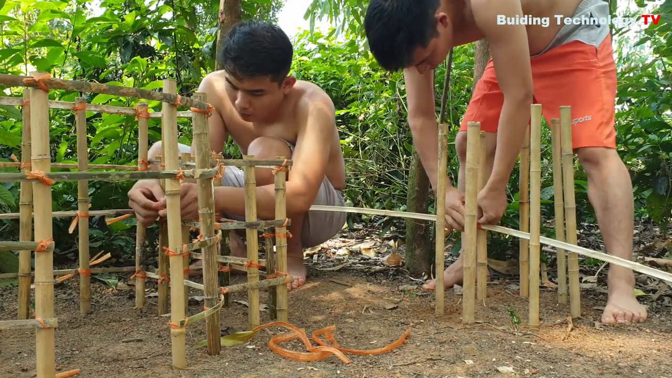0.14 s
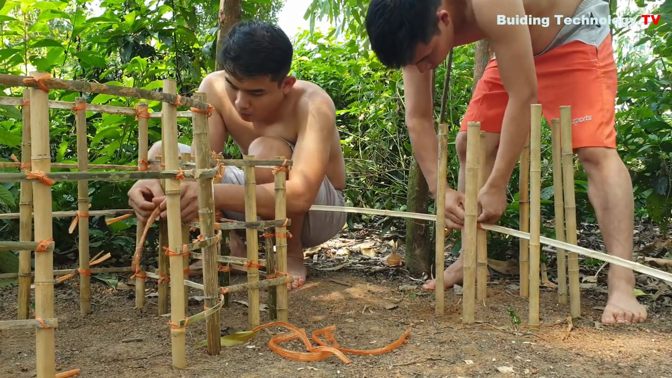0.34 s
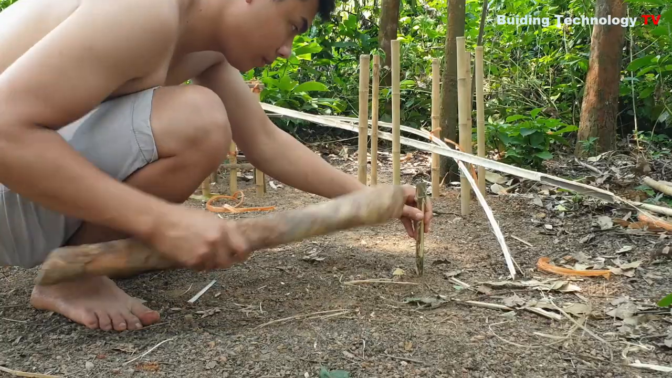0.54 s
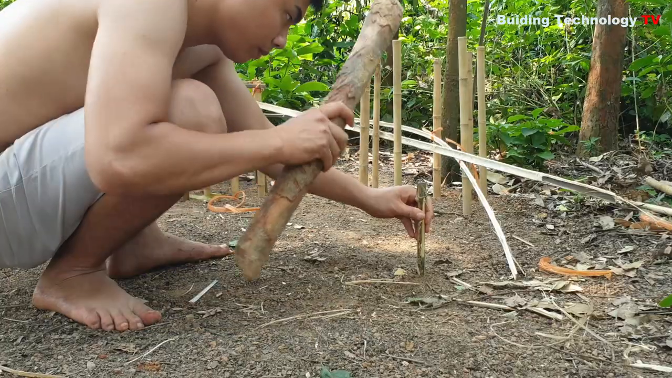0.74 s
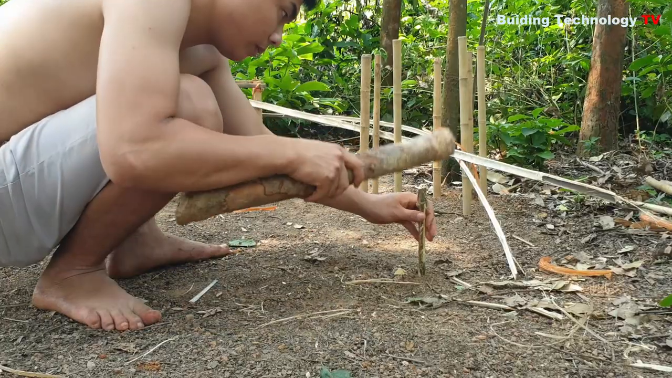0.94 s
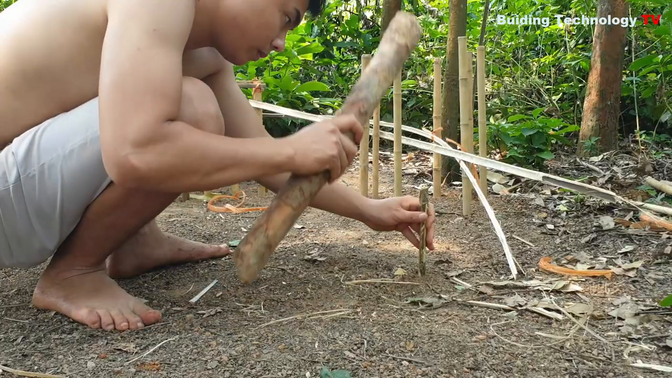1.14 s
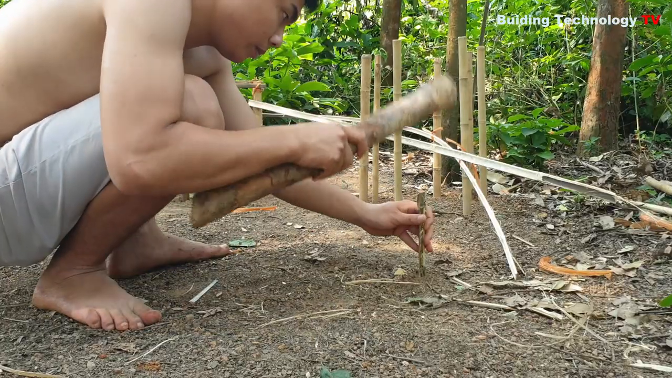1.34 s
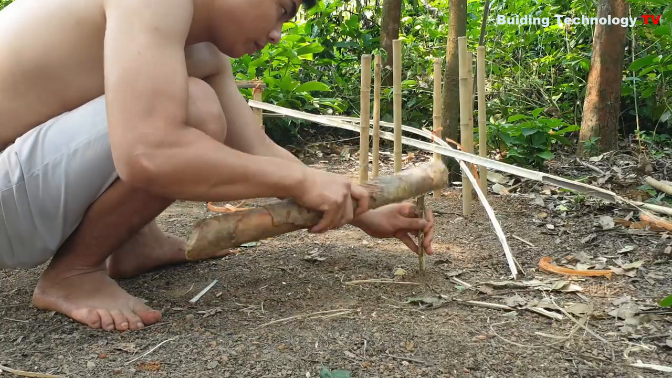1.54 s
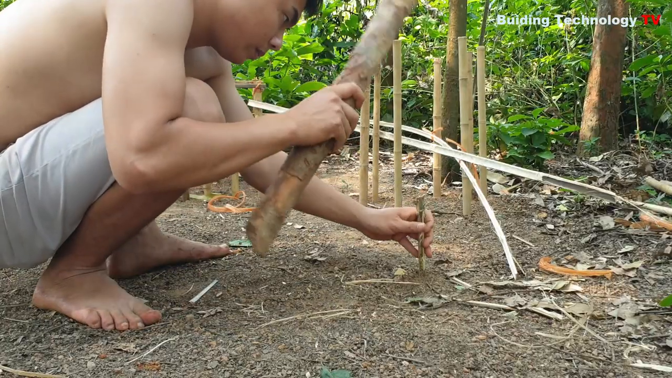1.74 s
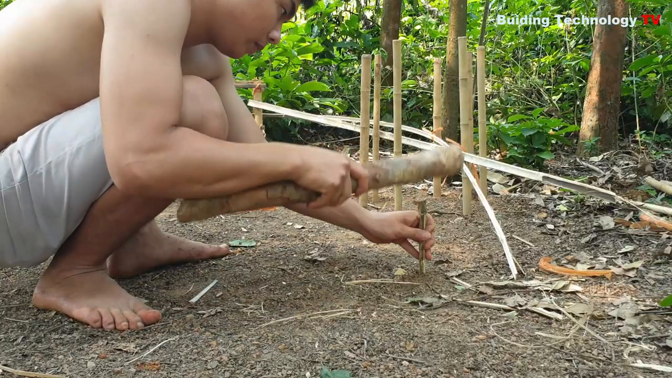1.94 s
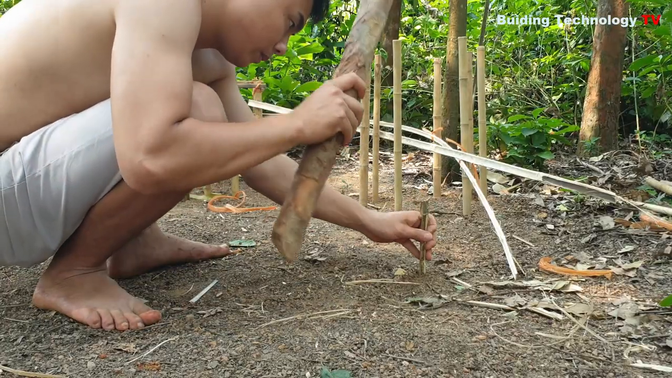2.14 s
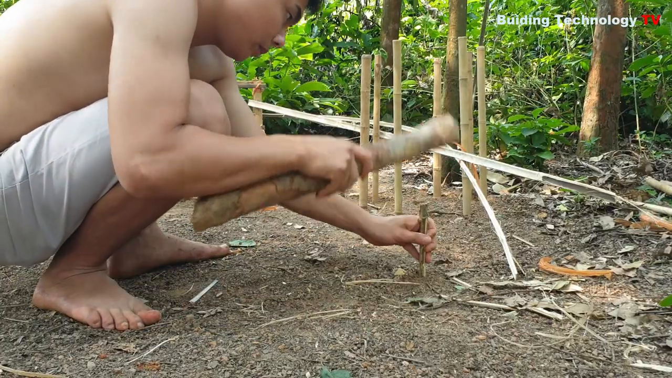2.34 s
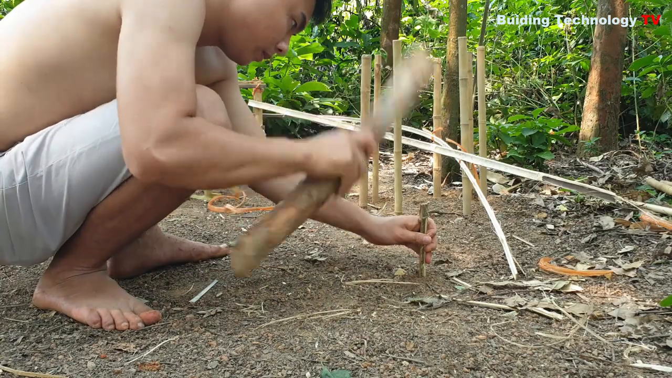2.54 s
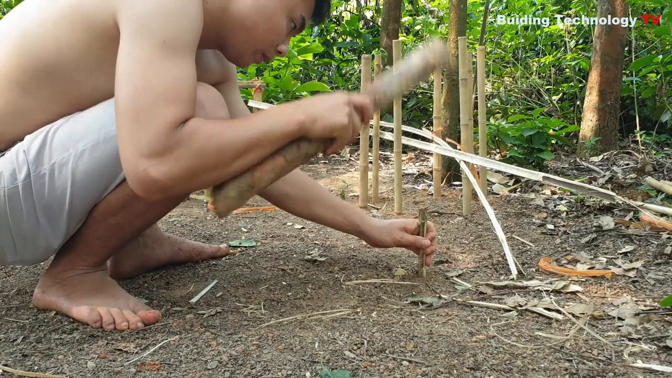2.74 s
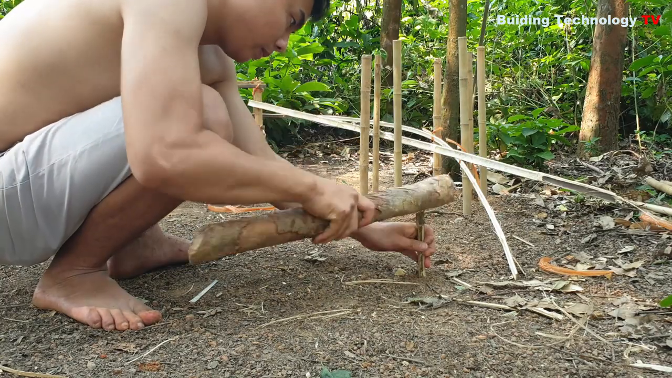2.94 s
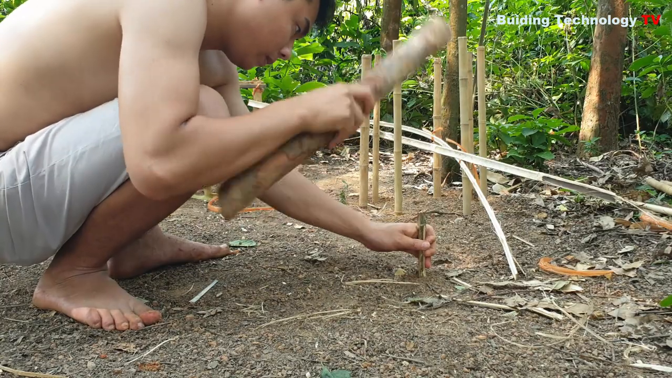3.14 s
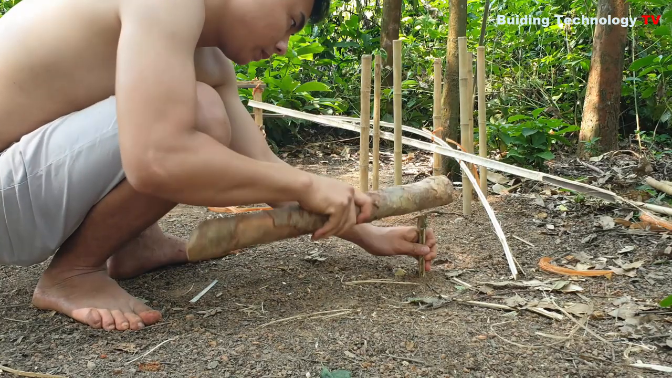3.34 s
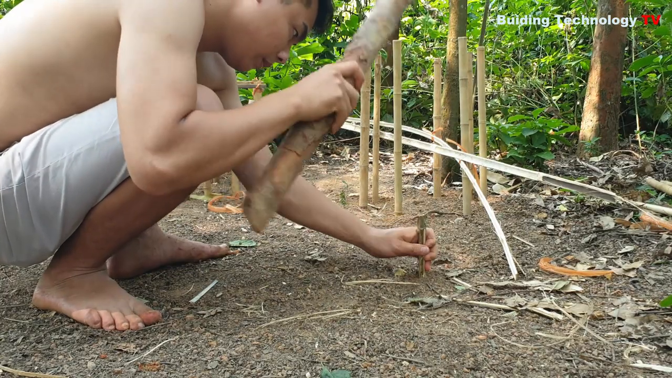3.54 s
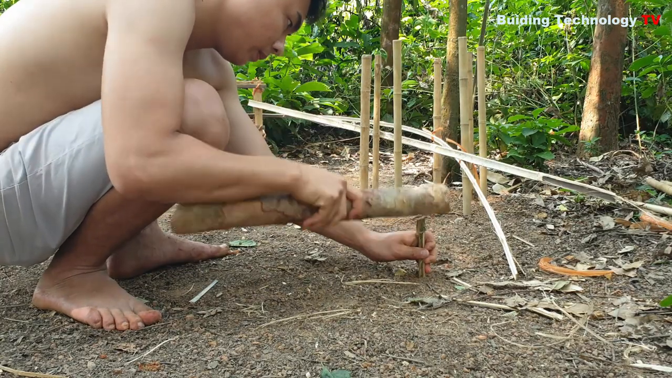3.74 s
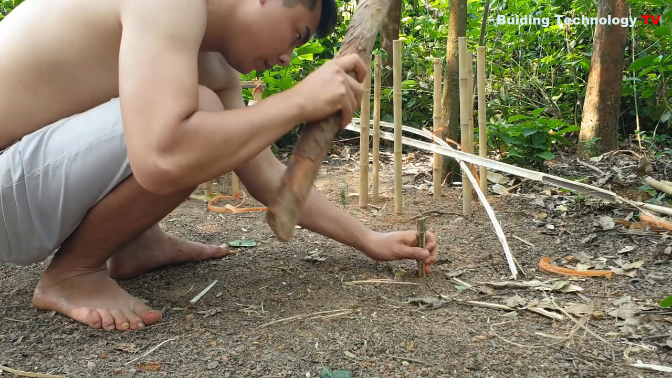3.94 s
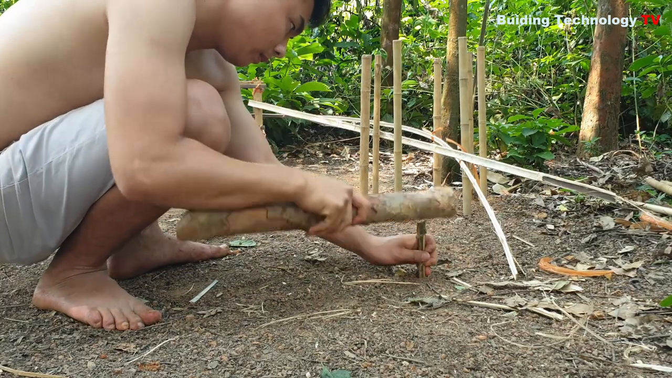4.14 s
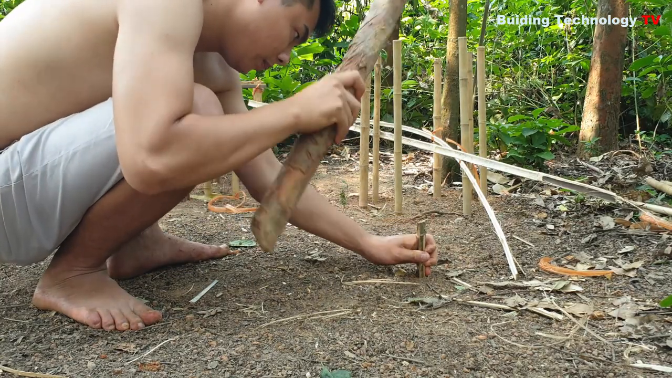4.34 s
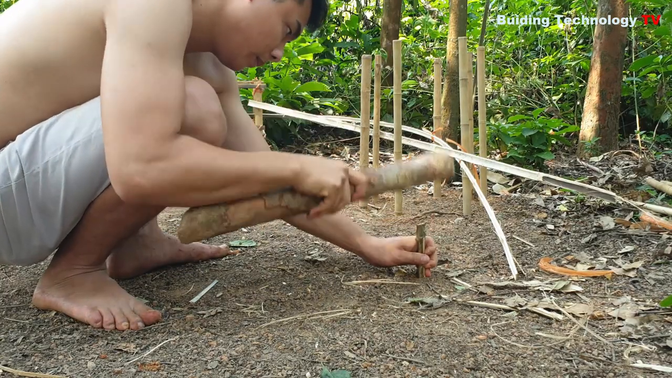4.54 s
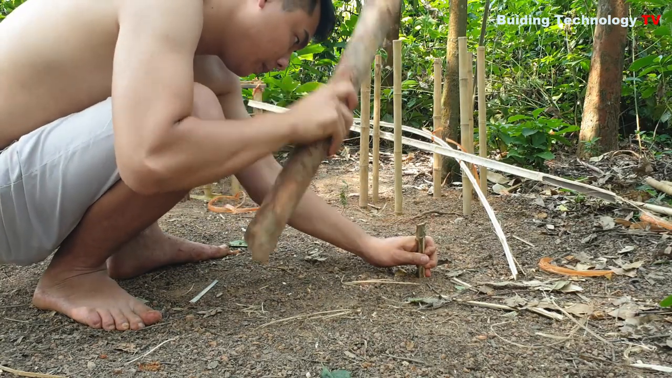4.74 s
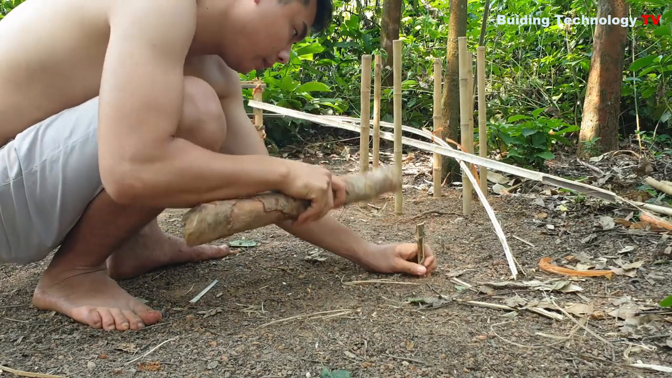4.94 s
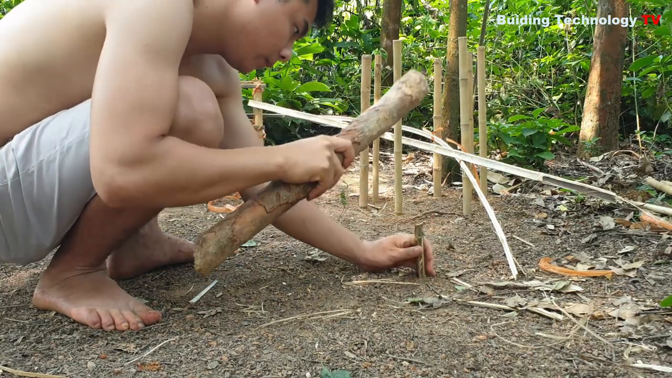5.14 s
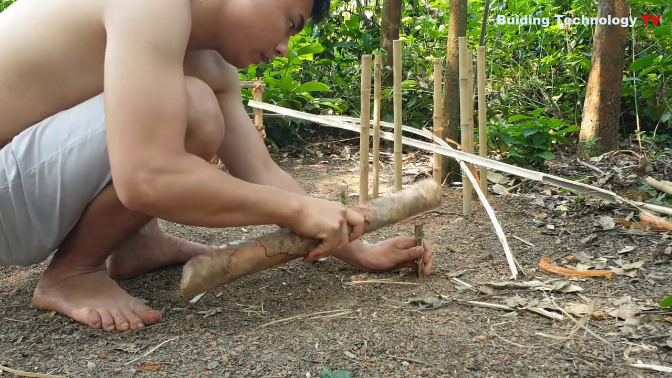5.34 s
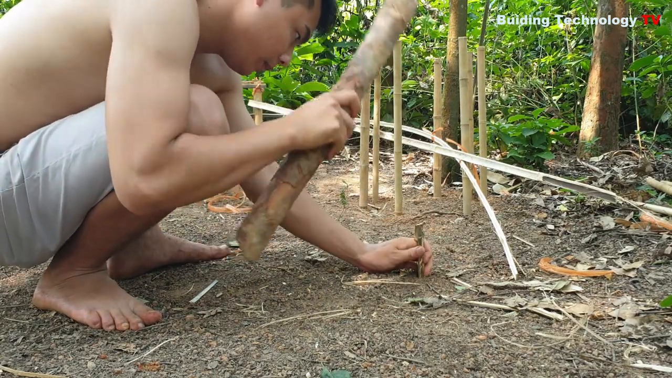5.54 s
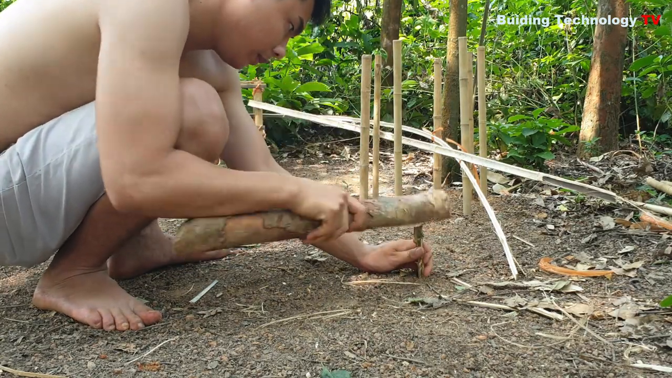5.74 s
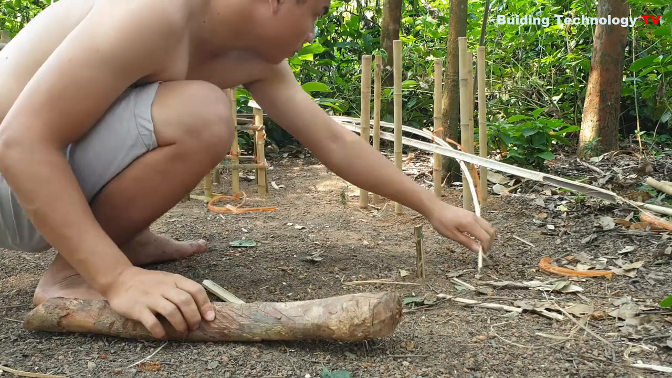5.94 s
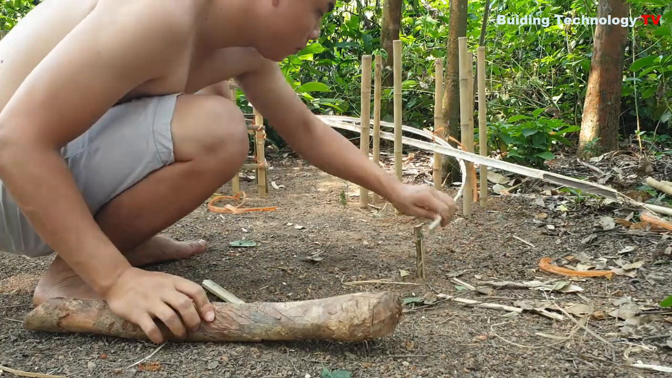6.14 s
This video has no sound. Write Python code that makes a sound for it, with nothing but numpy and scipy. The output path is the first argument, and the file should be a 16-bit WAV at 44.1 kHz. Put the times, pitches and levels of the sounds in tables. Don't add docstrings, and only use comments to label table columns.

```python
import sys
import numpy as np
from scipy import signal
from scipy.fft import rfft, irfft, next_fast_len
from scipy.io import wavfile
from scipy.ndimage import uniform_filter1d

SR = 44100
rng = np.random.default_rng(int(sys.argv[2]) if len(sys.argv) > 2 else 0)


def volts(x):
    e = np.asarray(x, float) / 20
    return 10 ** e


def store_wav(level_fs):
    pcm = np.round(np.clip(np.atleast_2d(level_fs), -1, 1) * 32767)
    wavfile.write(sys.argv[1], SR, pcm.T.astype(np.int16))


N = 276948
SPOT_CHANGE_S = 0.662

# (frequency [Hz], level [dB])
FIRST_AIR = [(15, -47), (25, -27), (66, -1.5), (141, 4.5), (344, -11), (489, -15.5), (545, -27), (818, -23),
             (2110, -33.5), (2690, -34.5), (8360, -28), (16000, -39)]
AIR = [(15, -46), (25, -61), (53, -6), (87, -1), (153, -10), (195, -11), (489, -27), (1560, -33.5),
       (2110, -29), (3720, -29), (9840, -31.5), (14800, -32.5), (16000, -33)]
FIRST_AIR_DB, AIR_DB = -47, -47.5
AIR_KNEE_HZ, AIR_STEP_DB, AIR_TOP_HZ = 10400, -9.5, 15900
HUSH_TOP_HZ, HUSH_DB = 15180, -77
RUMBLE_DB, RUMBLE_TOP_HZ = -61, 620
# (frequency [Hz], likeness [1])
LIKENESS = [(60, 0.93), (180, 0.94), (550, 0.1), (1650, -1.4), (4970, -1.3), (15000, -0.86)]
PORT_LAG = 1.354

# (time of height [s], rise and fall [s], level [dB], broad sweep re thin leaves [dB])
STIRS = [(0.001, 0.35, -70.5, 11.5), (0.279, 0.13, -61.5, -14), (.44, 0.13, -53.5, -13),
         (.61, 0.096, -55.5, -13.5), (.75, 0.42, -67.5, -6), (1.0, 0.29, -80.5, 15),
         (2.33, 0.34, -57.5, -13), (2.46, 0.07, -57, -19), (2.59, 0.09, -55, -17), (2.7, 0.1, -65.5, 2.5),
         (3.03, 0.25, -58.5, -9.5), (3.691, 0.073, -58.5, -4.5), (3.79, 0.1, -52.5, -7.5),
         (4.16, 0.047, -65.5, -12.5), (4.32, 0.19, -53, -17), (4.9, 0.083, -55, -8.5),
         (5.183, 0.089, -41.5, -11.5), (5.456, 0.16, -57, -16), (5.75, 0.86, -63, -4.5),
         (6.0, 0.27, -59, -7.5), (6.26, 0.28, -50.5, -12)]
STILL_DB, STIR_FALL_DB = -85.5, 23.5
# (frequency [Hz], level [dB], t60 [s])
TAIL = [(294, -13, 0.2), (673, 8.5, 0.041), (1500, -1.5, 0.068), (3000, 0.5, 0.12), (4500, -2, 0.14),
        (6760, -7, 0.074), (8600, -4, 0.14), (12900, -1, 0.013)]

# (time [s], firing rate [Hz], level [dB])
ENGINE = [(0, 134, -61), (.6, 137.7, -50), (.67, 147.9, -60), (.9, 153.5, -60.5), (1.0, 105.2, -57.5),
          (1.8, 112.4, -59.5), (2.0, 124, -56), (2.9, 130.4, -62), (3.5, 141.7, -62.5), (4.65, 152.3, -66),
          (4.9, 124.2, -75), (5.3, 141.8, -60), (5.8, 150.1, -59.5), (6.28, 156.6, -60.5)]
# (multiple of firing rate [1], level [dB])
ORDERS = [(1.0, -1.5), (1.5, -11), (2.0, -15), (2.5, -18.5)]
# (time [s], level [dB])
DRONE = [(0.0, -58), (0.3, -54.5), (0.8, -52), (1.12, -61), (1.3, -50), (2.43, -50.5), (3.38, -55),
         (3.9, -56), (4.12, -64), (4.48, -63), (5.19, -57.5), (5.37, -53), (5.79, -50), (6.05, -65),
         (6.28, -51)]
DRONE_HZ = 76.7

# (time [s], length [s], from [Hz], to [Hz], level [dB], hoarseness [Hz])
HOARSE = [
    (0.001, 0.097, 6550, 5580, -60, 250),
    (.002, 0.044, 4050, 3100, -64.5, 540),
    (2.265, .03, 4120, 4500, -65, 423),
    (3.295, 0.08, 2500, 4800, -60, 350),
]
# (time [s], length [s], from [Hz], to [Hz], level [dB])
RIGHT_CALL = [
    (.005, 0.14, 6150, 5450, -67),
]
# (time after start [s], length [s], from [Hz], to [Hz], level [dB])
CHIP = [
    (0, 0.012, 4640, 4570, -8.5),
    (.009, 0.0124, 4490, 3130, -2),
    (0.07, 0.011, 5000, 4900, -4),
    (0.079, 0.012, 5000, 3110, 1),
]
# (time [s], level [dB], stretch of part gap [1], steep notes [dB])
CHIP_CALLS = [
    (.381, -55.5, 0.95, -1),
    (1.455, -53.5, 0.97, -1),
    (2.047, -50, 1.05, -9),
]
# (time [s], length [s], from [Hz], to [Hz], level [dB])
CHIRPS = [(1.367, 0.02, 1900, 2220, -76), (2.749, 0.025, 3440, 3000, -64), (3.237, .014, 1880, 1900, -69),
          (3.245, 0.026, 1800, 4010, -60), (3.215, 0.064, 4250, 4150, -74),
          (3.264, 0.018, 3900, 4720, -55.5), (3.28, .014, 4800, 5490, -61), (4.228, 0.022, 4900, 3900, -58),
          (5.467, 0.079, 2382, 2590, -72), (5.556, 0.062, 2550, 2926, -72), (5.8, 0.026, 1251, 980, -63),
          (5.89, 0.038, 1443, 990, -65), (6.0, 0.013, 980, 940, -69), (6.124, 0.017, 990, 980, -62.5)]
# (time [s], pitch [Hz], level [dB])
WHISTLES = [
    [(2.44, 2210, -69.5), (2.508, 2120, -73), (2.56, 2134, -72), (2.62, 2080, -65), (2.728, 2063, -64),
     (2.918, 2187, -65.5), (2.985, 2250, -77)],
    [(4.61, 2103, -77), (4.67, 2080, -68), (4.738, 2030, -71), (4.82, 1824, -54), (4.862, 1795, -60)],
    [(4.96, 1970, -68.5), (5.06, 1735, -52.5), (5.114, 1726, -51.5), (5.18, 1710, -87.5)],
    [(5.2, 1232, -69.5), (5.24, 1235, -73), (5.265, 1310, -73.5), (5.284, 1500, -55), (5.33, 1615, -58.5),
     (5.385, 1550, -52), (5.45, 1500, -94), (5.52, 1600, -74), (5.58, 1610, -80)],
]
# (time [s], pitch [Hz], level [dB])
WARBLES = [
    [(1.645, 2400, -73), (1.68, 2120, -72), (1.715, 1850, -73)],
    [(1.735, 2160, -69.5), (1.772, 3000, -71.5), (1.795, 2850, -79), (1.82, 2520, -72), (1.845, 2460, -82),
     (1.855, 2330, -72), (1.885, 2540, -73.5), (1.93, 2105, -76)],
    [(3.12, 2800, -73.5), (3.2, 2810, -71.5), (3.244, 2750, -78.5), (3.285, 2776, -70), (3.307, 2810, -58),
     (3.325, 2790, -73.5), (3.355, 2814, -68)],
]
# (time [s], length [s], level [dB])
FALLING = [
    (5.51, 0.05, -66),
    (5.611, 0.042, -58.5),
    (5.841, 0.041, -52),
    (5.945, 0.032, -53),
    (6.064, 0.037, -54),
    (6.178, 0.031, -55),
]
FALL_FROM_HZ, FALL_TO_HZ = 2160, 1560
FALL_PAN_DB, CHIP_PAN_DB, CHIRP_PAN_DB, RIGHT_CALL_PAN_DB = -6.5, -5, -4.5, -10

# (time [s], peak level [dB], centre [Hz],
# left re right [dB])
TICKS = [(.016, -42, 12500, -4), (.661, -45, 800, 0.3), (2.948, -46.5, 10980, 1), (3.667, -51.5, 7000, 1),
         (3.905, -50.5, 11900, 0.5), (4.006, -67, 12500, 1.5), (4.081, -51.5, 8500, -1.5),
         (4.374, -47.5, 11500, 1.5), (5.293, -43, 9040, -3.5), (5.312, -42, 9000, 1.5),
         (5.661, -41, 6996, 1), (5.922, -43, 9000, -4), (0.1044, -45.5, 6060, -1),
         (.1244, -42, 10100, -12.5), (0.412, -37.5, 7400, -4), (0.4429, -39, 8300, 3),
         (0.4564, -38.5, 4540, -7.5), (0.5821, -42, 8040, -3), (.6094, -56, 8250, -6),
         (0.6294, -43, 10200, -7.5), (2.1755, -37, 4670, 0), (2.3989, -43.5, 2518, -5.5),
         (2.8699, -34, 8735, 11), (2.8873, -29, 2892, -2.5), (3.1368, -46, 2846, 7.5),
         (3.6845, -38, 9620, 11), (3.8122, -35, 11780, 0.5), (3.8244, -36.5, 12040, 3.5),
         (3.8412, -32.5, 5140, 4), (3.8794, -46.5, 3343, 1), (4.1919, -34.5, 9000, 1),
         (4.2288, -33, 4630, 4), (4.3879, -34, 10300, 8.5), (4.4548, -35.5, 3410, 4),
         (5.5433, -38.5, 6780, 0.5), (5.6042, -37, 9510, 0), (5.6526, -39, 8210, -1),
         (5.6744, -40, 7900, 0.5), (5.7074, -36.5, 9010, 9.5), (5.9579, -39, 9850, -12.5),
         (5.9894, -36, 8850, -11.5), (3.138, -45.5, 11000, 0), (3.175, -50, 11500, 0.5)]
INSECT_TICKS_S = [5.976, 6.0156, 6.0344, 6.2203]
INSECT_TICK_DB, INSECT_TICK_HZ, INSECT_TICK_PAN_DB = -45, 12500, -21.5

# (start [s], end [s], pitch [Hz], level [dB])
INSECTS = [
    (0.76, 1.303, 2500, -84.5),
    (0.66, 1.25, 4300, -81.5),
    (.67, 0.72, 6700, -87),
]

# (time [s], crack peak [dB], thud [dB], landing toward the tip [dB], landing off the grain [dB])
BLOWS = [(0.921, -23, -40, -15.5, 3), (1.2563, -7, -32, -6, -4.5), (1.5892, -8, -28, 5, -2.5),
         (1.9315, -5, -27.5, 2, 3.5), (2.2765, -3.5, -25.5, 6, -1), (2.626, -9.5, -27, -8.5, 6.5),
         (2.9903, -6, -26, -1.5, 0.5), (3.3595, -0.5, -25.5, -1.5, 2), (3.729, -4.5, -28, 5.5, 3.5),
         (4.1158, -8, -23.5, -1.5, 5.5), (4.4904, -4, -23, 5, 5.5), (4.8708, -8.5, -37, 12, 0.7),
         (5.3726, -22.5, -28, 14, 15), (5.7332, -7.5, -22, 4, -1.5)]
USUAL_CRACK_DB, USUAL_THUD_DB = -10, -25
# (usual level [dB], share of crack [1], of thud [1], of tip landing [1], of off-grain landing [1])
GRIP = [(-28.5, -0.27, 0.31, 0.44, -0.2), (-30, 0.2, .15, 0.65, -0.8), (-23, -0.11, 0.69, -0.16, -0.067),
        (-22.5, 0.69, -0.24, -0.56, -0.3), (-25, 1.1, -0.041, 0.1, 0.52), (-32.5, -0.8, 0.94, 0.55, 0.43),
        (-23, 0.98, -0.28, -0.61, -0.52), (-42.5, -0.36, -0.0085, 0.095, 0.4),
        (-19.5, 0.53, 0.029, 0.05, -0.47), (-19, -0.29, 1, 0.089, 0), (-22, .6, .5, 0.39, -0.1),
        (-34, -0.8, 0.39, 0.18, -0.2), (-6.5, 0.77, 0.42, -0.47, 0.2)]
# (frequency [Hz], level [dB], t60 [s]); one group per row of GRIP
CLUB = [
    [(508, -3, 0.093), (547.5, -10, 0.082), (620, -4.5, 0.029), (980, -11, 0.031)],
    [(1487, -4.5, 0.072), (1555, -13, 0.04), (1375, -9, 0.021)],
    [(2283, -4, 0.023), (2573, 6.5, 0.02), (2590, -39, 0.045), (2747, 2, 0.015)],
    [(3462, 7, 0.0095), (3260, -1.5, 0.015), (3715, 0.5, 0.021)],
    [(4668, 2.5, 0.0098), (4250, -1, 0.0067), (5000, -11, 0.012)],
    [(1840, -17, 0.0048), (2028, -4, 0.013)],
    [(3410, -16.5, 0.076), (3410, -15, 0.045), (3100, -15.5, 0.025)],
    [(640, -2, 0.047), (1310, -9, 0.072), (930, -8.5, 0.048)],
]
CLUB_PAN_DB = [1.5, 4, 1, -3, -3, 1, -1, 3]
# (flat-face slap [dB], ringing into trees [dB], finest splinters [dB], hard knock [dB])
LANDING = [(11, -3, 4, -7), (5.5, 0, -2.5, 1.5), (8, 3, 6.5, -8.5), (-11.5, 2.5, 2, -10),
           (-7.5, 2, 2.5, -5), (-14, 0, -5, -5), (4, -1, 3, -7), (-1.5, -1.5, -6, -3.5),
           (-2.5, 3.5, -5.5, -1.5), (-1.5, -2.5, 9, 10.5), (-1, -1.5, -4, 8), (8, 1.5, 12.5, 21),
           (1.5, 2.5, -2, -4.5), (5, -3, 8, 17)]
# (low ring [dB], middle ring [dB], side modes [dB], stake bend [dB], contact length [ms])
HOLD = [(-7.5, -6, -4, -7.5, 1.9), (-2.5, -4.5, -4.5, 3.5, 0.72), (-2.5, 0, 10, 3.5, 1.5),
        (1.5, 1, 1, -22, 1.1), (-1, -1, -6.5, -19, 1.4), (5.5, 10, -4, -10, 0.87), (-1, 1.5, 9, -18, 1.2),
        (1.9, -4, -3.5, -1, 1.6), (-2, 1, -8, -9, 0.83), (-13, -10.5, 4, 9, .8), (-6, 2, -4, 9.5, .9),
        (-2.5, -2.5, 14, 7.5, 1.2), (0, 3.5, -7.5, 0.5, 1.3), (-2.5, -4, 5, 11.5, 0.94)]
TRIMMED_BY = {9: 0, 6: 1, 12: 1, 10: 2, 5: 3, 0: 4, 1: 5, 7: 6, 11: 7}
# (2.3 kHz [dB], 2.6 kHz [dB], 3.3 kHz [dB], 3.7 kHz [dB], 4.7 kHz [dB])
NODES = [(9, 3, -5.5, -5.5, -3), (-1, -6.5, -1, 1.5, 3.5), (8.5, 0, 3.5, -8, -3.5), (0.5, 1, 1.5, 3, -4),
         (2.5, -0.5, 2.5, 4, -5.5), (5.5, -1, 0.5, -0.5, 4.5), (6.5, 1.5, 2, 1.5, -1),
         (-2.5, 4.5, 0.5, -1, 0), (-8, 2.5, 4.5, 0.5, 2), (-3, 3, 0.5, 3.5, 2.5),
         (-8, -4.5, 3.5, 4.5, -3.5), (0, 6.5, -12, -1, 0), (-1, -8, 2, 10, -5), (3, 2.5, 1, -8, 0)]
# (630 Hz [dB], 980 Hz [dB], twin thud [dB])
LOW_NODES = [(7.5, -4, 0.1), (-3.5, 1.7, 0.1), (6, -4, -0.5), (-2, -6, 2), (-1.5, 1, 0.7), (-2.5, -7, 2),
             (1.5, 8, 0.5), (-0.5, 5.5, 0.5), (3, 5, 2.7), (-3, 2, -2.5), (3.5, 9, -1.5), (-11, 4, -6),
             (0, -5.5, 0.5), (-1, 3, -0.5)]
NODE_OF = {(2, 0): 0, (2, 1): 1, (2, 3): 2, (3, 0): 2, (3, 1): 2, (3, 2): 3, (4, 0): 4, (0, 2): 5, (0, 3): 6}
GAP_HZ, GAP_WIDE_HZ = 1880, 350
GRAZE_S = 0.002

# (thud after crack [ms], twin after thud [ms])
GROUND_MS = [(4.6, 8.2), (2.6, 8.5), (2.3, 8.6), (2.0, 8.9), (2.2, 8.9), (1.7, 8.9), (1.9, 8.9), (2.1, 8.9),
             (1.8, 8.9), (1.8, 8.8), (1.9, 8.8), (1.7, 8.6), (2.3, 8.2), (1.9, 8.8)]
# (slap pitch [Hz], deep give [dB])
SOIL = [(1530, 35), (1350, 13.5), (1600, 25), (1415, 0.5), (1000, 0.5), (1320, -4), (980, 1), (1060, -3.5),
        (1330, -3), (1346, -5), (1300, -3), (1330, -8), (1360, -4), (1064, -6)]
THUD_HZ, THUD_T60_S, SOIL_HZ = 200.5, 0.026, 110
SECOND_THUD_DB, SECOND_T60_S = -2.5, 0.025

MICROPHONE_TOP_HZ, PEAK_TOP = 16850, 1.3


def rms_one(x):
    return x / np.sqrt(np.mean(x ** 2) + 1e-20)


def in_time(rows):
    s, *columns = np.transpose(rows)
    return [np.interp(np.arange(N) / SR, s, c) for c in columns]


def at_hz(points, hz, column=1):
    points = np.array(points)
    return np.interp(np.log(hz), np.log(points[:, 0]), points[:, column])


def drift(rate):
    step = 40
    pole = np.exp(-2 * np.pi * step * rate / SR)
    white = rng.standard_normal(N // step + 2002)
    slow = signal.lfilter([1], [1, -2 * pole, pole * pole], white)[2000:]
    return np.interp(np.arange(N) / step, np.arange(len(slow)), rms_one(slow))


def clicks(s, heights):
    out = np.zeros(N)
    out[np.round(np.asarray(s) * SR).astype(int)] = heights
    return out


def ring(force, hz, t60):
    pole, w = volts(-60 / (t60 * SR)), 2 * np.pi * hz / SR
    return signal.lfilter([0, np.sin(w)], [1, -2 * pole * np.cos(w), pole * pole], force + 1e-18, axis=-1)


def dying(force, t60):
    return signal.lfilter([1], [1, -volts(-60 / (t60 * SR))], force + 1e-18)


def band(x, low_hz, high_hz):
    return signal.sosfilt(signal.butter(2, [low_hz, high_hz], "band", fs=SR, output="sos"), x)


def gap(x):
    return signal.lfilter(*signal.iirnotch(GAP_HZ, GAP_HZ / GAP_WIDE_HZ, SR), x)


def ports(x, pan_db):
    late = np.interp(np.arange(N) - PORT_LAG, np.arange(N), x)
    return np.array([x * volts(pan_db / 2), late * volts(-pan_db / 2)])


def answer_db(group):
    _, crack_db, thud_db, tip_db, grain_db = np.transpose(BLOWS)
    usual_db, *shares = GRIP[group]
    trim_db = np.hstack([LANDING, HOLD])[:, TRIMMED_BY[group]] if group in TRIMMED_BY else 0
    blow_db = [crack_db - USUAL_CRACK_DB, thud_db - USUAL_THUD_DB, tip_db, grain_db]
    return usual_db + trim_db + np.dot(shares, blow_db)


def noise_bands():
    edges = 25 * 2 ** np.arange(0, 9.6, 0.5)
    white = rng.standard_normal((2, 2, N))
    for k, (low, high) in enumerate(zip(edges, edges[1:])):
        centre_hz = np.sqrt(low * high)
        mid, side = band(white[k % 2], low, high)
        alike = np.clip(at_hz(LIKENESS, centre_hz), 0, 1)
        yield centre_hz, np.sqrt(1 + alike) * mid + np.sqrt(1 - alike) * side * [[1], [-1]]


def stirring():
    t = np.arange(0, N, 100) / SR
    thin, sweep = volts(STILL_DB), volts(STILL_DB - 8)
    for s, width, db, sweep_db in STIRS:
        swell = volts(db - STIR_FALL_DB * np.abs(t - s) / width)
        thin, sweep = thin + swell, sweep + swell * volts(sweep_db)
    return [np.interp(np.arange(N) / SR, t, gain) for gain in (thin, sweep)]


def tree_echo(blows, hz):
    t60 = at_hz(TAIL, hz, column=2)
    return dying(blows, t60) - 0.11 * dying(blows, 0.023) + 0.071 * dying(blows, 3.1 * t60)


def air_rustle_and_tails():
    first = np.arange(N) < SPOT_CHANGE_S * SR
    blows = clicks(np.array(BLOWS)[:, 0] + 0.00038, volts(answer_db(group=12)))
    grain_db = 4.0 * np.minimum(rng.exponential(1, N // 64 + 1), 3.0)
    grit = rms_one(volts(grain_db).repeat(64)[:N])
    thin, broad = stirring()
    air, leaves, sweep, tails, gust = 0, 0, 0, 0, drift(4.1)
    for hz, noise in noise_bands():
        level_db = np.where(first, at_hz(FIRST_AIR, hz) + FIRST_AIR_DB - AIR_DB, at_hz(AIR, hz))
        flicker = drift(36)
        air = air + noise * volts(level_db + 0.89 * gust + 2.74 * flicker)
        leaves = leaves + noise * volts(-5.0 * np.log2(hz / 12500) ** 2)
        sweep = sweep + noise * volts(-2.5 * np.log2(hz / 2600) ** 2) * (hz > 400)
        debris = grit ** 0.18 if hz > 4000 else 1
        tail_gain = volts(at_hz(TAIL, hz) - 26.0 + 2.0 * flicker) * (hz > 200)
        tails = tails + noise[::-1] * debris * tree_echo(blows, hz) * tail_gain
    steep = signal.cheby1(6, 3, RUMBLE_TOP_HZ, fs=SR, output="sos")
    rumble = first * volts(RUMBLE_DB) * rms_one(signal.sosfilt(steep, rng.standard_normal(N)))
    rustle = grit * thin * volts(-7.5) * rms_one(leaves) + np.sqrt(grit) * broad * rms_one(sweep)
    under = signal.sosfiltfilt(signal.butter(4, AIR_KNEE_HZ, fs=SR, output="sos"), air)
    air = np.where(first, air, under + volts(AIR_STEP_DB) * (air - under))
    return volts(AIR_DB - 8.5) * rms_one(air) + rumble + rustle + gap(tails)


def far_top(x):
    size = next_fast_len(N)
    spectrum, hz = rfft(x, size), np.arange(size // 2 + 1) * SR / size
    low = irfft(spectrum * (hz < HUSH_TOP_HZ), size)[:, :N]
    top = irfft(spectrum * ((hz >= HUSH_TOP_HZ) & (hz < AIR_TOP_HZ)), size)[:, :N]
    treble_power = np.mean(band(x, 11000, 15000) ** 2, axis=0)
    treble_db = 10 * np.log10(uniform_filter1d(treble_power, size=2048) + 1e-14)
    return low + top * np.clip((treble_db - HUSH_DB) / 2, 0, 1)


def engine():
    hz, level_db = in_time(ENGINE)
    turn = 2 * np.pi * np.cumsum(hz * (1 + 0.008 * drift(5.5))) / SR
    orders = sum(volts(db + np.clip(4 * drift(7), -12, 3)) * np.sin(k * turn) for k, db in ORDERS)
    swell = volts(0.82 * drift(2.9))
    drone = swell * np.sin(2 * np.pi * np.cumsum(DRONE_HZ * (1 + 0.0253 * drift(3.77))) / SR)
    return np.sqrt(2) * (volts(level_db) * orders + volts(in_time(DRONE)[0]) * drone)


def glide(from_hz, to_hz, n):
    return np.sin(2 * np.pi * np.cumsum(np.linspace(from_hz, to_hz, n)) / SR)


def chirps():
    notes = [(*RIGHT_CALL[0], RIGHT_CALL_PAN_DB)]
    for s, db, stretch, steep_db in CHIP_CALLS:
        for at, length, from_hz, to_hz, note_db in CHIP:
            level_db = db + note_db + steep_db * (from_hz > 1.2 * to_hz)
            notes.append((s + at * stretch, length, from_hz, to_hz, level_db, CHIP_PAN_DB))
    for s, length, db in FALLING:
        notes.append((s, length, FALL_FROM_HZ, FALL_TO_HZ, db, FALL_PAN_DB))
    return notes + [(*row, CHIRP_PAN_DB) for row in CHIRPS]


def whistle(rows):
    hz, level_db = in_time(rows)
    t = np.arange(N) / SR
    gate = np.clip(np.minimum(t - rows[0][0], rows[-1][0] - t) / 0.017, 0, 1)
    return np.sqrt(2) * gate * volts(level_db + 1.5 * drift(30)) * np.sin(2 * np.pi * np.cumsum(hz) / SR)


def birds():
    long_notes = sum(whistle(rows) for rows in WHISTLES + WARBLES) * np.ones((2, 1))
    dry = np.zeros((2, N))
    for s, length, from_hz, to_hz, db, pan_db in chirps():
        i, n = round(s * SR), round(length * SR)
        note = glide(from_hz, to_hz, n) * np.sqrt(np.hanning(n))
        dry[:, i:i + n] += note * volts([[db + 7.0 + pan_db / 2], [db - pan_db / 2]])
    for s, length, from_hz, to_hz, db, wide_hz in HOARSE:
        i, n = round(s * SR), round(length * SR)
        slow = signal.butter(2, wide_hz, fs=SR, output="sos")
        rasp = rms_one(signal.sosfilt(slow, rng.standard_normal((2, SR // 4))))[:, :n]
        dry[:, i:i + n] += rasp * glide(from_hz, to_hz, n) * np.linspace(1, 0.25, n) * volts(db + 9.5)
    t = np.arange(SR // 4) / SR
    trunks = rng.standard_normal((2, len(t))) * volts(-60 * t / 0.35) * (t > 0.004)
    trunks = trunks / np.sqrt(np.sum(trunks[0] ** 2))
    wet = signal.fftconvolve(dry + 0.62 * long_notes, trunks, axes=1)[:, :N]
    return 0.88 * dry + long_notes + volts(-1.0) * wet


def ticks():
    out, size = np.zeros((2, N)), 600
    decay = volts(-60 * np.arange(size) / SR / 0.008)
    insect_ticks = [(s, INSECT_TICK_DB, INSECT_TICK_HZ, INSECT_TICK_PAN_DB) for s in INSECT_TICKS_S]
    for s, db, hz, pan_db in TICKS + insect_ticks:
        i = round(s * SR)
        burst = rng.standard_normal((2, size)) * decay
        snap = band(burst, hz / 2.07, min(hz * 3.5, 17000))
        out[:, i:i + size] += snap / np.abs(snap).max() * volts([[db + pan_db / 2], [db - pan_db / 2]])
    return out


def insects():
    return sum(whistle([(start, hz, db), (end, hz, db)]) * volts(3 * drift(12)) for start, end, hz, db in INSECTS)


def club():
    s, contact_s = np.array(BLOWS)[:, 0], np.array(HOLD)[:, -1] / 1000
    nodes_db = np.hstack([NODES, LOW_NODES])
    out = np.zeros((2, N))
    for group, modes in enumerate(CLUB):
        body = 0
        for k, (hz, db, t60) in enumerate(modes):
            node_db = nodes_db[:, NODE_OF[group, k]] if (group, k) in NODE_OF else 0
            luck = rng.random((len(s), 2))
            level_db = answer_db(group) + node_db + db + 3.4 * luck[:, 1] - 21
            contact = clicks(s + contact_s * (luck[:, 0] - 0.3), volts(level_db))
            contact = contact + 0.06 * np.roll(contact, -round(GRAZE_S * SR))
            body = body + ring(ring(contact, hz, 0.0033), hz, t60)
        out += ports(body if group == 5 else gap(body), CLUB_PAN_DB[group])
    return out


def splinters():
    s = np.array(BLOWS)[:, 0]
    out = np.zeros((2, N))
    for group, low_hz, high_hz, pan_db in ((8, 6090, 10450, -6.5), (10, 13700, 15000, -10.5)):
        swell = dying(dying(clicks(s, volts(answer_db(group) - 9)), 0.0015), 0.006)
        out += ports(swell * band(rng.standard_normal(N), low_hz, high_hz), pan_db)
    return out


def slap():
    out = np.zeros(N)
    for (s, *_), db, (hz, _) in zip(BLOWS, answer_db(group=9) - 3.5, SOIL):
        out -= ring(clicks(s + 0.001112, volts(db)), hz, 0.012)
    return ports(gap(out), 0.3)


def thud():
    s, thud_db = np.transpose(BLOWS)[[0, 2]]
    lag_s, twin_s = np.transpose(GROUND_MS) / 1000
    first = clicks(s + lag_s, volts(thud_db + 11.5))
    twin_db = thud_db + 11.5 + SECOND_THUD_DB + np.array(LOW_NODES)[:, -1]
    second = clicks(s + lag_s + twin_s, volts(twin_db))
    soft = signal.sosfilt(signal.butter(2, 450, fs=SR, output="sos"), second)
    suck = 0.9 * ring(clicks(s + lag_s - 0.0017, volts(thud_db + 13.5)), 330, 0.0045)
    bend = ring(clicks(s + lag_s, volts(answer_db(group=11))), 325, 0.051)
    give = ring(clicks(s + lag_s, volts(thud_db + np.array(SOIL)[:, 1] - 25)), SOIL_HZ, 0.063)
    swing = ring(first, THUD_HZ - 12, THUD_T60_S) + ring(soft, THUD_HZ, SECOND_T60_S) - suck + give + bend
    swing = signal.sosfilt(signal.butter(2, 75, "high", fs=SR, output="sos"), swing)
    lopsided = 0.09 * ring(soft, 190, 0.03)
    return swing * volts([[0.2], [-0.2]]) + lopsided * [[1], [-1]]


def scene():
    blows = club() + splinters() + slap() + thud()
    far = far_top(air_rustle_and_tails() + ticks())
    return blows + far + birds() + insects() + engine()


def roll_off(x):
    return signal.sosfilt(signal.butter(12, 16840, fs=SR, output="sos"), x)


def record(dry):
    heard = signal.sosfilt(signal.butter(3, 46, "high", fs=SR, output="sos"), dry)
    rounded = PEAK_TOP * np.tanh(heard / PEAK_TOP)
    mix = signal.sosfilt(signal.cheby2(14, 30, MICROPHONE_TOP_HZ, fs=SR, output="sos"), rounded)
    return roll_off(mix)


dry = scene()
out = record(dry)
store_wav(out)
```